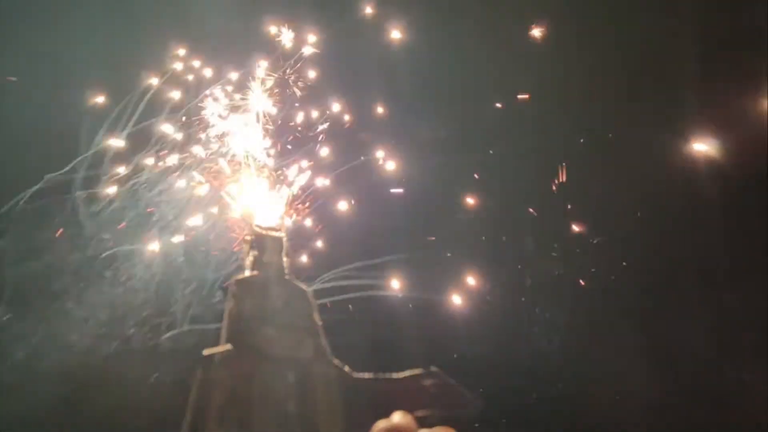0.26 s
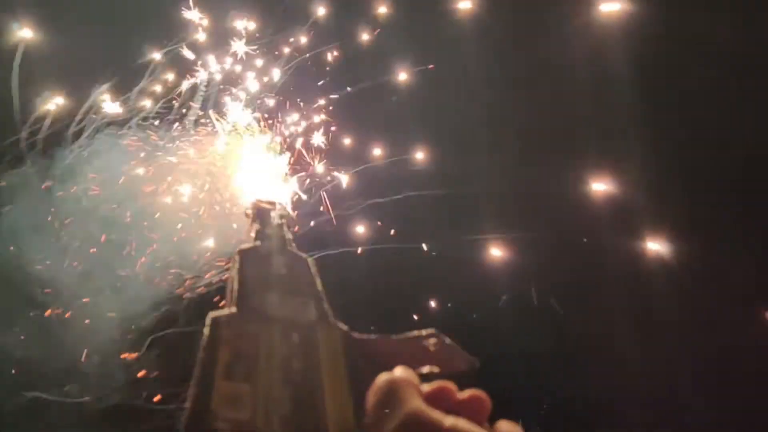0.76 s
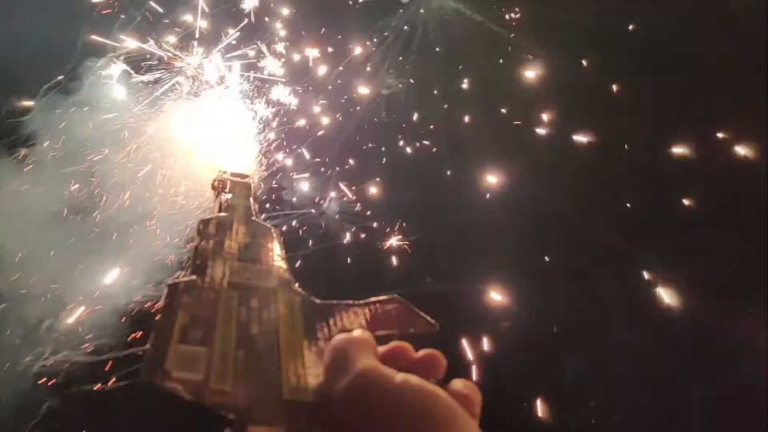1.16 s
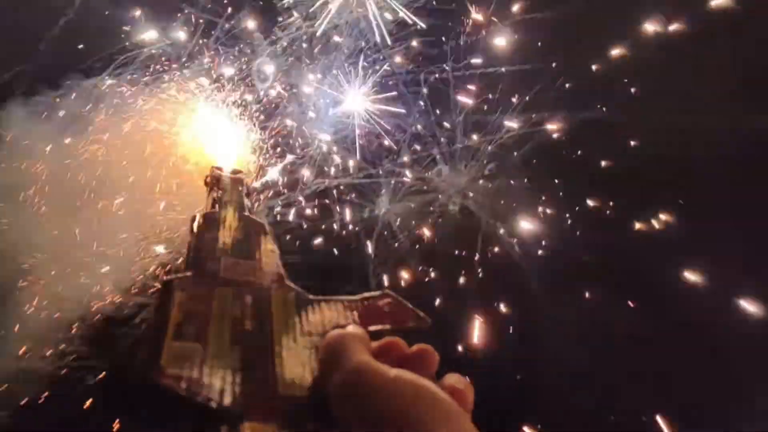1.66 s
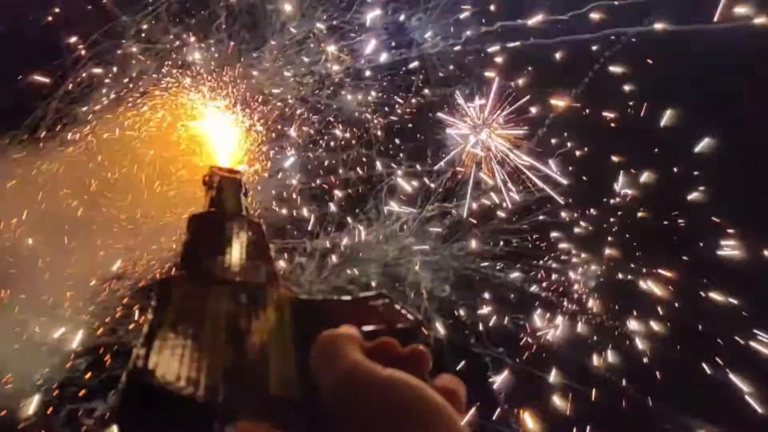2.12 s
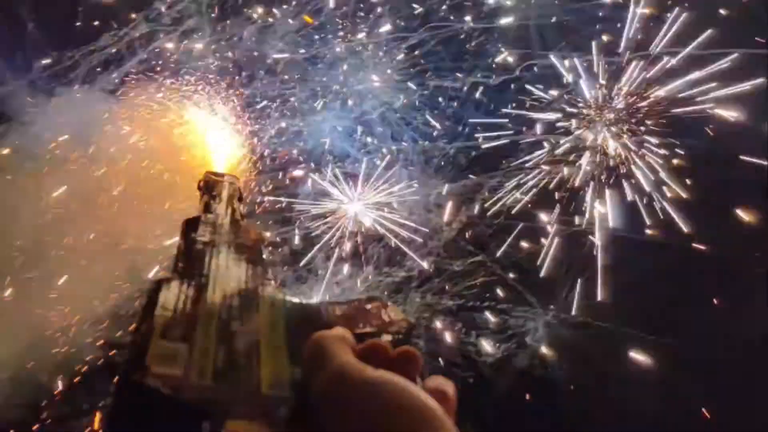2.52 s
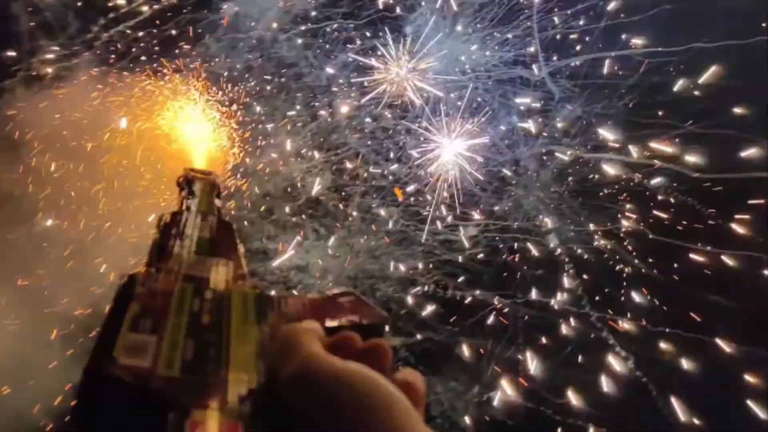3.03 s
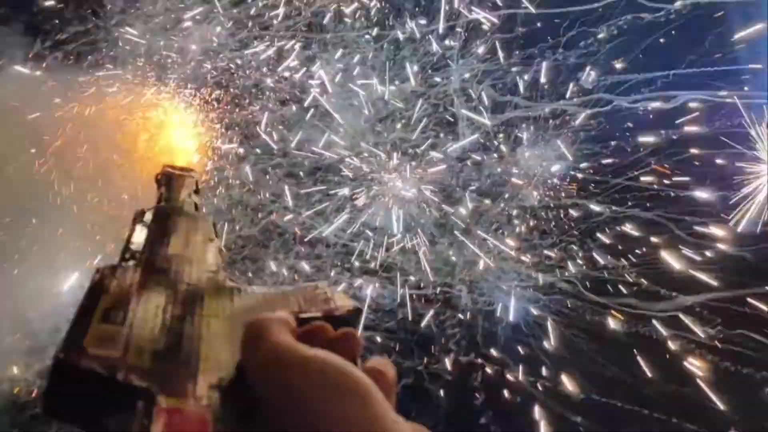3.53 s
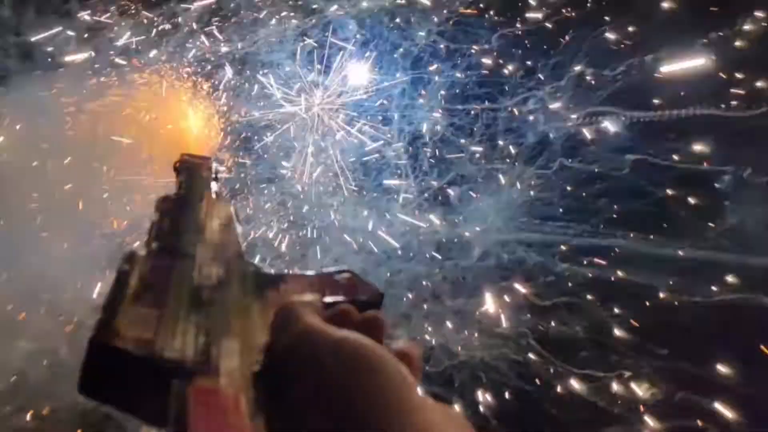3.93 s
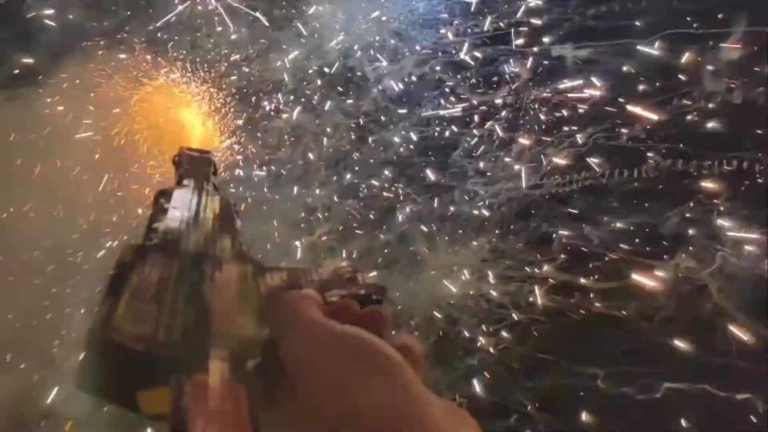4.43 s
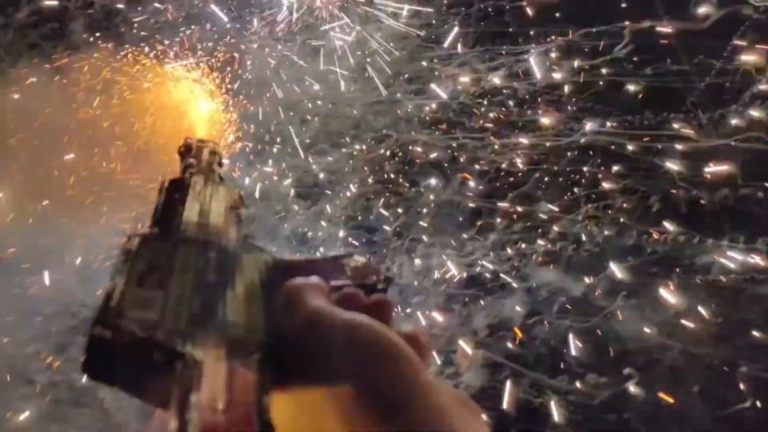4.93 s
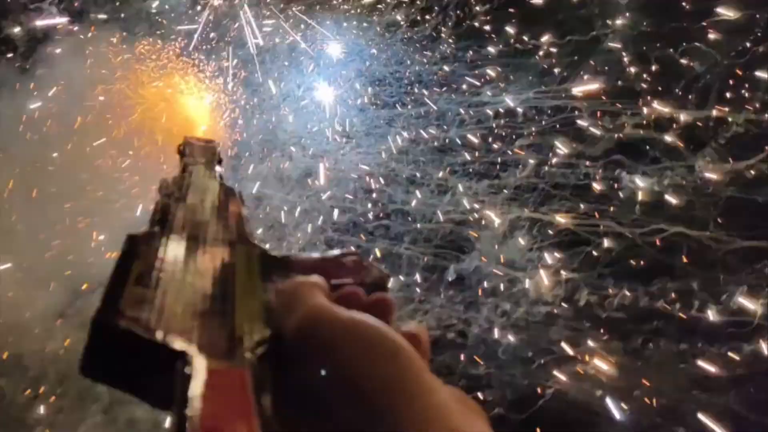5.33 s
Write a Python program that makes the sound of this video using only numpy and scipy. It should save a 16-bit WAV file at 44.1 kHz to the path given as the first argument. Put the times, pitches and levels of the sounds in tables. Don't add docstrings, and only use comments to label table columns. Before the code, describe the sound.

Close stereo phone-like pickup of a spark fountain held in the hand: a dense, wide, turbulent blast first, then bright thin hiss flickering rapidly and swinging between left and right. Gusts punch the right side with dull bumps, flaps and distortion, briefly smothering it, ease off in the middle, then return. No voices; only burning jet and wind.

```python
import sys
import numpy as np
from scipy import signal
from scipy.fft import rfft, irfft, next_fast_len
from scipy.io import wavfile
from scipy.ndimage import uniform_filter1d

SR = 44100
rng = np.random.default_rng(int(sys.argv[2]) if len(sys.argv) > 2 else 0)


def wrap_up_sound(samples):
    columns = np.atleast_2d(samples).T
    tamed = np.clip(columns, -1, 1)
    steps = np.round(tamed * 32767).astype(np.int16)
    wavfile.write(sys.argv[1], SR, steps)


def linear_from_db(decibels):
    return 10 ** (np.asarray(decibels, float) / 20)


N = 245637
HZ = np.fft.rfftfreq(next_fast_len(N), 1 / SR) + 1e-3


def in_time(rows):
    s, *columns = np.transpose(rows)
    return [np.interp(np.arange(N) / SR, s, c) for c in columns]


def at_hz(points, hz):
    point_hz, value = np.transpose(points)
    return np.interp(np.log(hz), np.log(point_hz), value)


def swells(rows):
    s, length, *sizes = np.transpose(rows)
    t = np.arange(0, N + 50, 50) / SR
    phase = np.clip((t - s[:, None]) / length[:, None], -.5, .5)
    shapes = np.cos(np.pi * phase) ** 2
    return [np.interp(np.arange(N) / SR, t, size @ shapes) for size in sizes]


def drift(rate):
    r = np.exp(-80 * np.pi * rate / SR)
    coarse = rng.standard_normal(N // 40 + 2002)
    slow = signal.lfilter([1], [1, -2 * r, r * r], coarse)[2000:]
    return np.interp(np.arange(N) / 40, np.arange(len(slow)), slow / slow.std())


def white_noise():
    return rfft(rng.standard_normal(next_fast_len(N)))


def coloured(white, colour_db, low_hz, high_hz):
    gain = linear_from_db(colour_db)
    inside = (HZ > low_hz) & (HZ < high_hz)
    return white * gain / np.sqrt(np.sum(gain[inside] ** 2) / len(HZ))


def smother():
    seal_s, length_s, seal_db = 2.458, 0.079, -44
    return linear_from_db(swells([(seal_s, length_s, seal_db)])[0])


# t [s], level [share of full scale]
PUSH = [(0.0, 0.002), (1.12, 0.002), (1.36, 0.03), (2.05, -0.001), (2.2, 0.12), (2.3, 0.53), (2.62, 0.59),
        (2.78, 0.376), (2.86, 0.48), (3.02, 0.195), (3.17, 0.22), (3.55, 0.02), (4.13, 0.01), (4.5, 0.18),
        (4.86, 0.08), (4.89, 0.68), (5.04, 0.06), (5.57, 0.19)]
# t [s], length [s], level [share of full scale]
FLAPS = [(1.193, 0.076, 0.11), (1.266, 0.064, -0.02), (1.525, 0.058, 0.045), (1.982, 0.12, 0.08),
         (2.173, 0.039, 0.07), (2.242, 0.049, -0.16), (2.367, 0.03, -0.3), (2.394, 0.051, 0.37),
         (2.438, 0.056, 0.39), (2.511, 0.05, -0.9), (2.688, 0.061, -0.62), (2.827, 0.053, -0.25),
         (2.85, 0.12, 0.28), (2.937, 0.054, -0.66), (2.983, 0.12, 0.56), (3.044, 0.11, 0.37),
         (3.074, 0.026, 0.2), (3.159, 0.11, -0.24), (3.196, 0.059, 0.21), (4.157, 0.038, 0.12),
         (4.184, 0.043, -0.1), (4.276, 0.051, 0.094), (4.36, 0.11, -0.13), (4.605, 0.129, -0.19),
         (4.626, 0.048, 0.19), (4.754, 0.033, 0.039), (4.84, 0.049, -0.14), (5.056, 0.15, 0.12),
         (5.376, 0.057, 0.07), (5.39, 0.071, -0.11)]
# t [s], length [s], level [share of full scale]
CREST = (4.92, .09, .1)


def membrane_push():
    steady = uniform_filter1d(in_time(PUSH)[0], size=SR // 120)
    return steady + swells(FLAPS + [CREST])[0]


def gust_gain(s, fall_s, peak_db, calm_db, spread):
    crown_s = 0.013
    t = np.arange(0, N + 50, 50) / SR
    away_s = np.hypot(t - s[:, None], crown_s) - crown_s
    fall_s = np.clip(fall_s[:, None], .025, .3) * spread
    gust_db = peak_db[:, None] - 20 * away_s / fall_s
    power = linear_from_db(2 * calm_db) + linear_from_db(2 * gust_db).sum(axis=0)
    return np.interp(np.arange(N) / SR, t, np.sqrt(power))


# f [Hz], level [dB per Hz]
EDDIES = [(20, 30.5), (40, 6), (110, -2), (230, -10.5), (480, -15), (1200, -21), (2500, -28.5), (6000, -50)]
# t [s], fall by 20 dB [s], peak level 60-400 Hz [dB],
# rasp level above 450 Hz [dB over the peak]
GUSTS = [(1.177, 0.02, -31, -1), (1.53, .1, -52, -4), (1.74, .03, -56, 0), (1.842, .03, -46, 10),
         (1.945, 0, -31.5, 0), (2.157, .04, -28.5, -5), (2.262, .05, -28, 0), (2.362, .045, -22.5, -3),
         (2.524, 0, -25.5, -3), (2.58, .06, -34, 3), (2.692, .05, -23, -5), (2.833, .028, -21, -7),
         (2.89, .055, -28, 8), (2.941, 0.14, -23.5, -3.5), (3.08, 0.05, -22, -1), (3.23, 0.1, -42.5, 4),
         (3.47, 0.5, -50.5, 5), (3.604, .1, -43, -6), (4.166, 0.07, -31.5, -5.5), (4.272, 0, -29.5, -3.5),
         (4.423, -0.1, -32, -7), (4.511, .08, -30, -5), (4.631, 0, -33, -8), (4.756, .06, -37, -5),
         (4.864, .07, -34, 2), (5.045, .065, -23.5, -9.5), (5.209, -0.5, -41.5, -1),
         (5.335, .05, -30.5, -4.5), (5.46, 2, -46.5, 4), (5.571, 0, -38, 0)]


def eddies():
    s, fall_s, peak_db, rasp_db = np.transpose(GUSTS)
    colour_db = at_hz(EDDIES, HZ) - 19 * (HZ < 36) - 50 * (HZ < 15)
    buffet = coloured(white_noise(), colour_db, 60, 400)
    small = 1 / (1 + (450 / HZ) ** 4)
    thumps = irfft(buffet * (1 - small))[:N]
    rasp = irfft(buffet * small)[:N]
    thumps = thumps * gust_gain(s, fall_s, peak_db, calm_db=-59.0, spread=0.9)
    rasp = rasp * gust_gain(s, fall_s, peak_db + rasp_db, calm_db=-60, spread=1.4)
    lumps_db = 1.6 * drift(35)
    return (thumps + rasp) * linear_from_db(lumps_db)


def wind():
    return membrane_push() + eddies() * smother()


def scatter():
    decay_s, ripple = .018, .4
    t = np.arange(SR // 10) / SR
    echoes = rng.standard_normal(len(t)) * np.exp(-t / decay_s)
    response = rfft(echoes, next_fast_len(N))
    response /= np.abs(response) ** (1 - ripple)
    return response / np.sqrt(np.mean(np.abs(response) ** 2))


# f [Hz], level [dB per dB of fullness]
FULLNESS_LIFT = [(80, -0.03), (240, 0.84), (700, 1.3256), (1800, 1.13), (4000, 0.64), (7000, 0.64),
                 (11000, 0), (15500, 0)]
# f [Hz], level [share of power]
FLAME_SHARE = [(200, .85), (1500, .7), (3000, .5), (6000, .5), (10000, .3), (15500, .2)]


def hiss(flame, colour_db, fullness_db):
    thin_share, full_at_db = .5, 9.0
    patchy_db, fast_db = 1.1, 1.1
    pair = coloured(np.array([flame * scatter(), white_noise()]), colour_db, 9000, 15500)
    focus = np.clip(thin_share + (1 - thin_share) * fullness_db / full_at_db, thin_share, 1)
    out = np.zeros(N)
    for hz in 45 * 2 ** np.arange(0, 9, .5):
        octaves = np.clip(np.log2(HZ / hz), -.5, .5)
        from_flame, from_spray = irfft(pair * np.cos(np.pi * octaves) ** 2)[:, :N]
        share = focus * np.clip(at_hz(FLAME_SHARE, hz), 0, 1)
        band = np.sqrt(share) * from_flame + np.sqrt(1 - share) * from_spray
        flicker_db = patchy_db * drift(5.5) + fast_db * drift(13.7)
        out += band * linear_from_db(at_hz(FULLNESS_LIFT, hz) * fullness_db + flicker_db)
    return out


# f [Hz], level [dB per Hz]
LEFT_PORT = [(40, -6), (110, -2), (230, 1.5), (500, -2.5), (1500, 1.5), (3000, 3), (4700, 3.5), (5600, 0.5),
             (9000, -0.46), (15700, -2)]
RIGHT_PORT = [(60, -11), (400, -7.5), (1500, -2.5), (3200, 2.5), (5500, 4), (7300, 6), (8400, -1.5),
              (9700, -11.5), (10900, -2.5), (14500, 2), (15700, 2)]
# f [Hz], width [Hz], level [dB]
LEFT_RINGS = [(642, 120, 5), (1093, 200, 5), (2096, 136, 5), (3180, 300, 3.5), (4110, 190, 3),
              (4870, 400, 5.5)]
# t [s], sizzle level above 9 kHz [dB], fullness of the body over a thin jet [dB],
# right minus left [dB]
BURN = [(0.0, -37, 9.5, -2.2), (0.18, -40, 12.5, 0), (0.4, -35.1, 9, -2.5), (0.58, -37.5, 5.5, 1.6),
        (0.8, -34, 9, -1.5), (1.0, -33, 4.5, -4.5), (1.05, -49, 4.9, 0.5), (1.3, -29.5, -9, 1.5),
        (1.6, -35.4, -1.4, -0.2), (2.1, -32, -7.7, 1), (2.45, -39, -0.1, -3.5), (2.9, -35, -5.5, 2.4),
        (3.2, -35, -3, 0), (3.6, -35, -4, 0.4), (4.1, -39.5, -0.2, 0.5), (4.5, -39, 0.9, -1.6),
        (5.1, -36, -3.5, -0.8), (5.57, -39.5, -0.6, -0.7)]
# t [s], length [s], sizzle [dB], fullness [dB]
CHOKES = [(1.297, 0.193, -13.5, 12.5), (1.45, 0.21, -15, 11.5), (1.657, 0.12, -5.9, 8),
          (1.787, 0.15, -14, 10), (1.9, 0.088, -12.5, 7.5), (2.008, 0.24, -7.0, 5.5),
          (2.057, 0.052, -11, 10.5), (2.121, 0.116, -9, 13), (2.201, 0.22, -9, 2),
          (2.332, 0.15, -10.5, 2.5), (2.495, 0.3, -4.5, -0.9), (2.635, 0.12, -11.5, 3.2),
          (2.768, 0.129, -18.5, 6), (2.888, 0.14, -5.5, 6), (3.019, 0.27, -9.4, 5.5),
          (3.175, 0.1, -3.5, 6.5), (3.372, 0.061, -4.6, 2), (3.472, 0.091, -9, 3.5),
          (3.706, 0.078, -1.5, 1.3), (4.203, 0.17, -13, 2.5), (4.303, 0.19, -6.5, -2.4),
          (4.55, 0.105, -8, -4.5), (4.786, 0.13, -3.5, 0.5), (4.934, 0.2, -8.5, 3.5),
          (5.277, 0.15, -3.5, 4.0), (5.381, 0.14, -6.8, 0.8), (5.566, 0.077, -11, 0)]
# t [s], length [s], sizzle [dB], fullness [dB]
SPURTS = [(0.04, 0.22, -0.5, 5), (0.239, 0.13, -1, 2.5), (0.514, 0.26, 0.6, 4.5), (0.717, 0.12, -0.5, 2),
          (1.13, 0.22, 5, 0.5), (1.533, 0.17, 0.0, 6.5), (2.54, 0.12, 0.5, 3.5), (3.132, 0.063, 1, 2),
          (3.294, 0.093, 0.0, 3.5), (3.57, 0.184, -0.5, 3), (3.753, 0.068, 0.0, 3.7),
          (3.962, 0.14, 4.5, 0.6), (4.113, 0.29, 4.5, -5.5), (4.257, 0.081, 7.5, -5.5),
          (4.436, 0.17, 7, -1.4), (4.648, 0.09, 7.5, -3), (5.04, 0.049, 1, -3), (5.137, 0.12, 0.5, 4.5),
          (5.431, 0.088, 5.5, -0.7)]
# t [s], length [s], level [dB], right minus left [dB]
CATCHES = [
    (1.26, 0.078, -4.5, 0.5),
    (1.44, .07, -2, 0.5),
    (2.31, .05, -3, -2),
    (4.03, 0.053, -1.5, -2),
    (4.225, 0.044, -1.5, -1),
    (4.775, .06, -4, -3),
    (4.93, .05, -4.5, -3),
]
# t [s], length [s], right minus left [dB]
SWINGS = [(0.368, 0.31, 4.5), (1.01, 0.1, 1.5), (1.189, 0.2, -3.1), (1.458, 0.22, -0.8),
          (1.665, 0.203, -3.5), (1.931, 0.17, -5), (2.162, 0.156, -5.4), (2.296, 0.1, -7),
          (2.358, 0.058, 8.5), (2.666, 0.15, 4.6), (2.822, 0.05, 0.5), (3.074, 0.159, 2.2),
          (3.386, 0.06, 2), (3.525, 0.149, 4.6), (3.684, 0.18, 2.5), (4.134, 0.23, 2.8),
          (4.339, 0.091, 6.5), (4.585, 0.097, 4), (4.745, 0.3, -5), (4.995, 0.19, 6.5), (5.266, 0.16, 4),
          (5.415, 0.26, -4)]


def jet():
    burn_sizzle_db, burn_fullness_db, burn_right_db = in_time(BURN)
    pulse_sizzle_db, pulse_fullness_db = swells(CHOKES + SPURTS)
    catch_db, catch_right_db = swells(CATCHES)
    sizzle_db = burn_sizzle_db + pulse_sizzle_db + catch_db
    fullness_db = burn_fullness_db + pulse_fullness_db
    right_db = burn_right_db + swells(SWINGS)[0] + catch_right_db
    rings_db = sum(db / (1 + (2 * (HZ - hz) / width) ** 2) for hz, width, db in LEFT_RINGS)
    flame = white_noise()
    left = hiss(flame, at_hz(LEFT_PORT, HZ) + rings_db, fullness_db)
    right = hiss(flame, at_hz(RIGHT_PORT, HZ), fullness_db)
    return np.array([left * linear_from_db(sizzle_db), right * linear_from_db(sizzle_db + right_db) * smother()])


def scene():
    return wind() * [[0], [1]] + jet()


def roll_off(x):
    return signal.sosfilt(signal.butter(12, 16000, fs=SR, output="sos"), x)


def record(dry):
    top, knee = 0.68, 22
    held = dry / (1 + np.abs(dry / top) ** knee) ** (1 / knee)
    cutoff_hz = 15748
    mix = irfft(rfft(held, next_fast_len(N)) * (HZ < cutoff_hz))[:, :N]
    return roll_off(mix)


dry = scene()
out = record(dry)
wrap_up_sound(out)
```